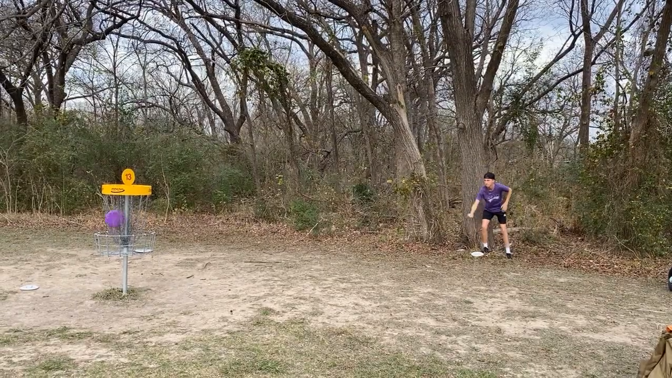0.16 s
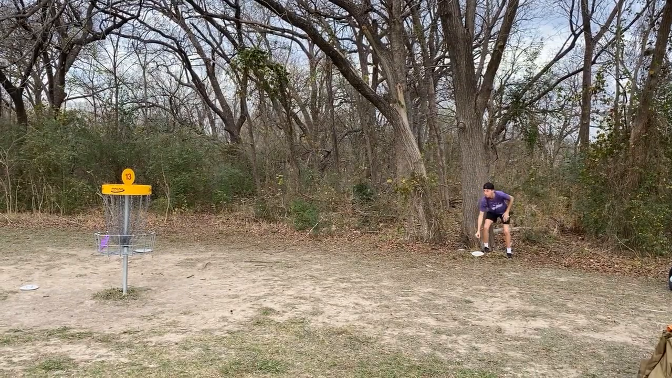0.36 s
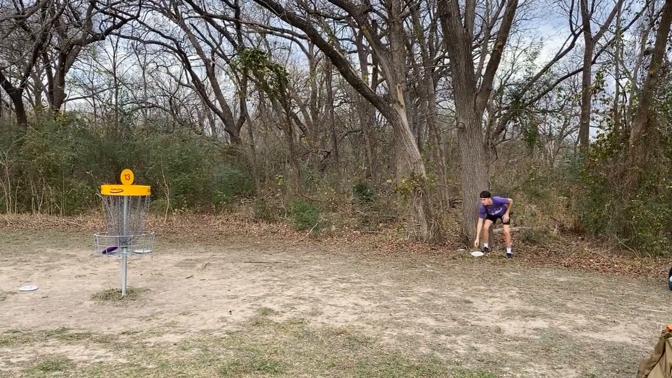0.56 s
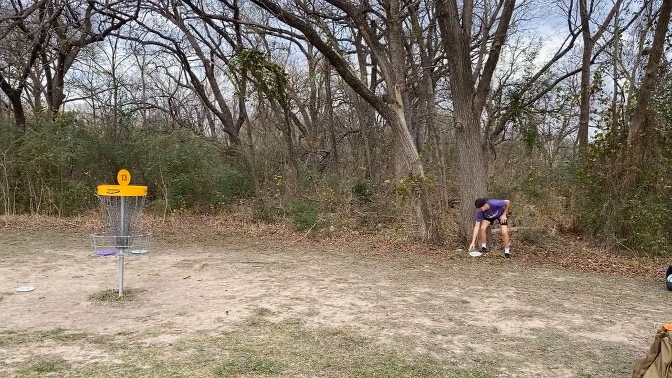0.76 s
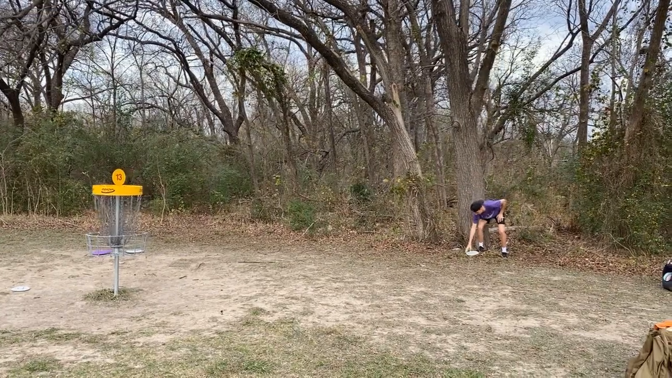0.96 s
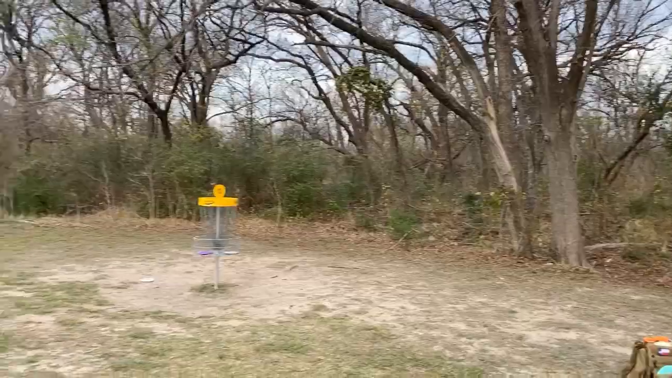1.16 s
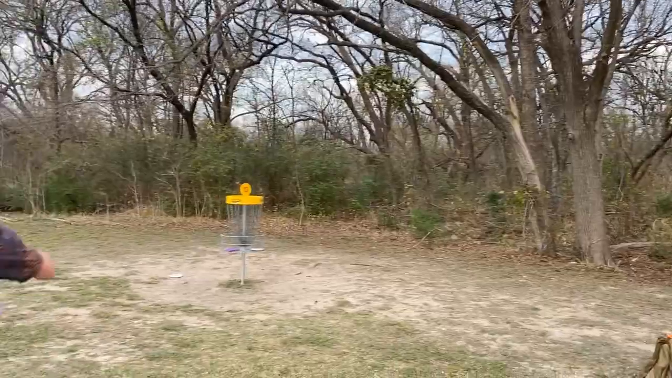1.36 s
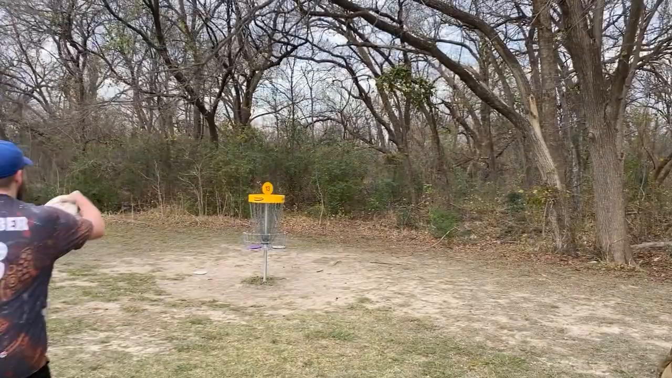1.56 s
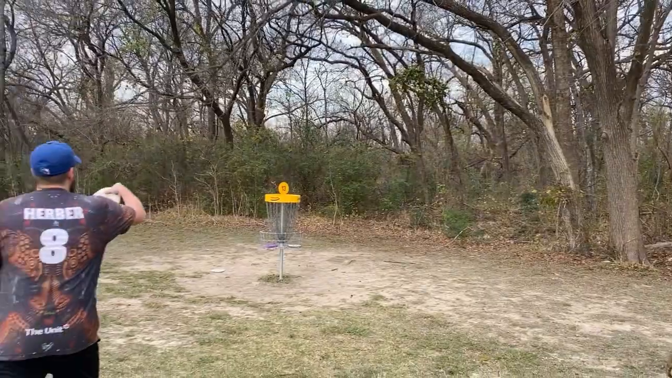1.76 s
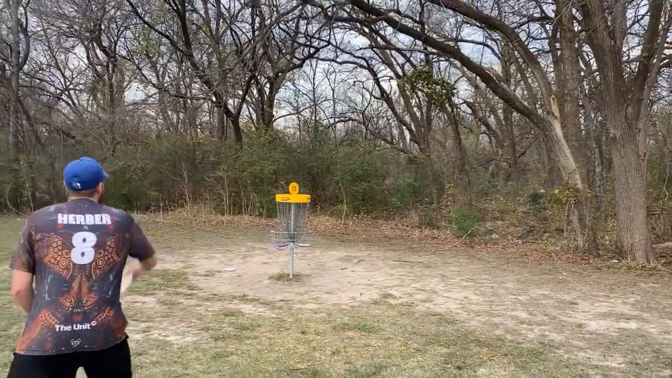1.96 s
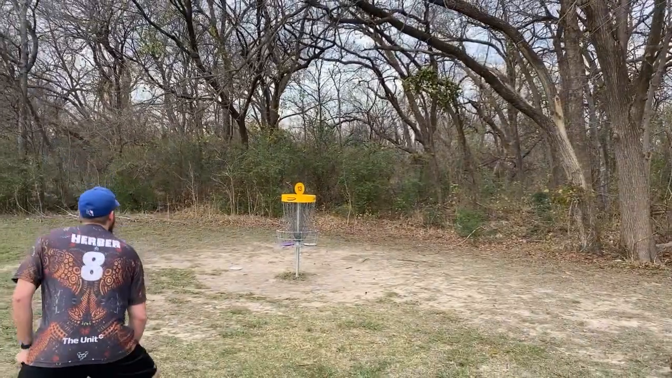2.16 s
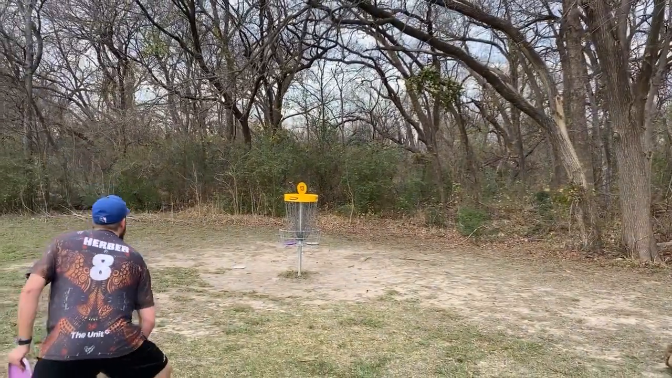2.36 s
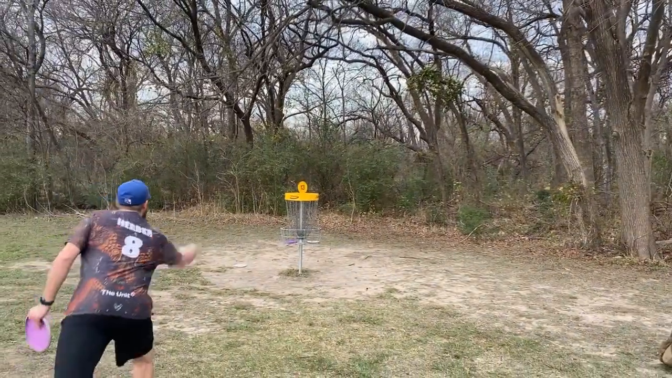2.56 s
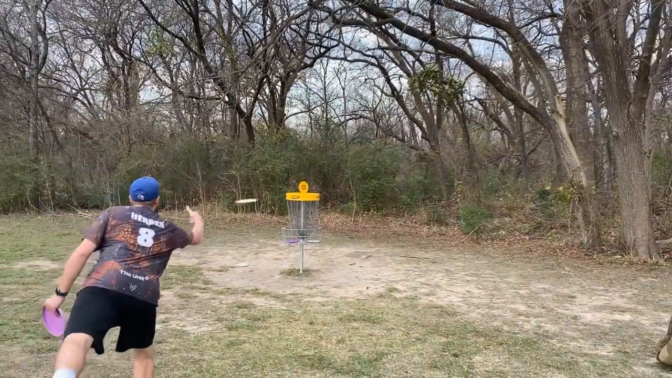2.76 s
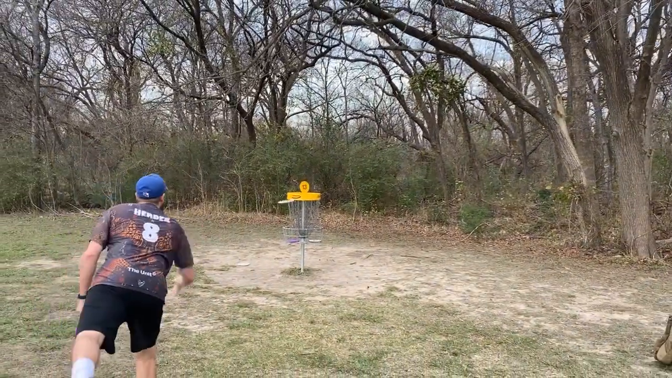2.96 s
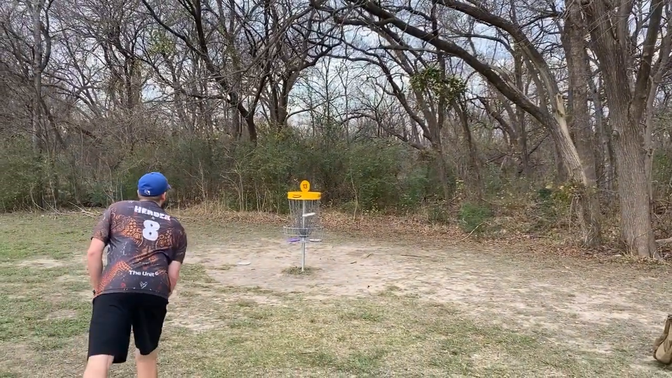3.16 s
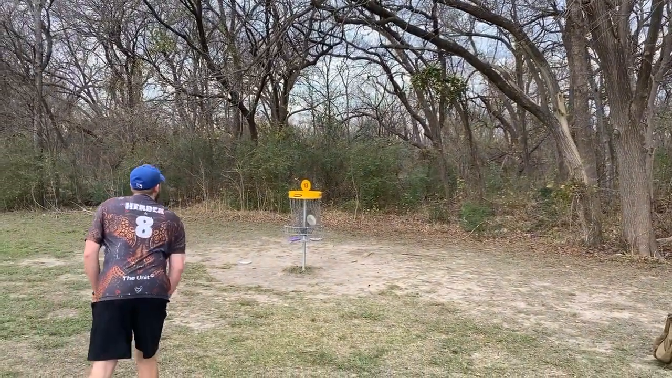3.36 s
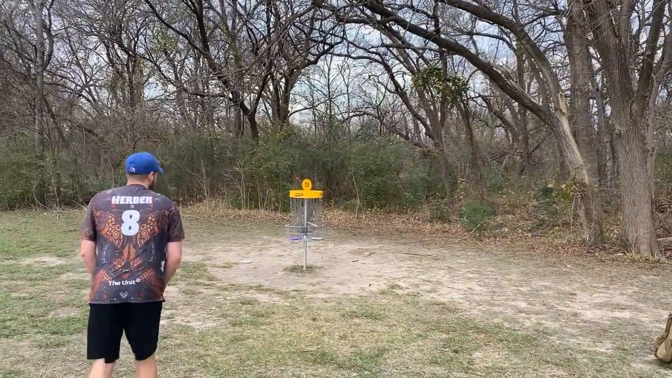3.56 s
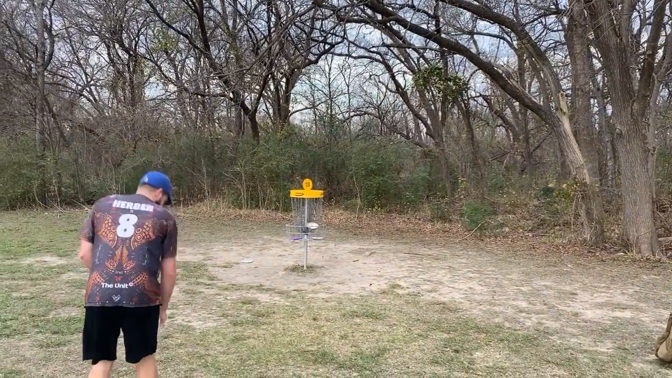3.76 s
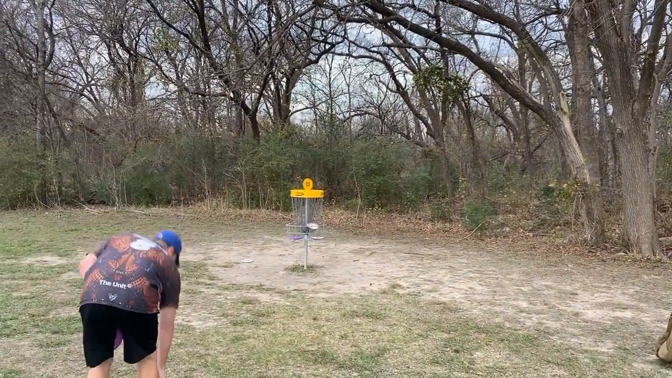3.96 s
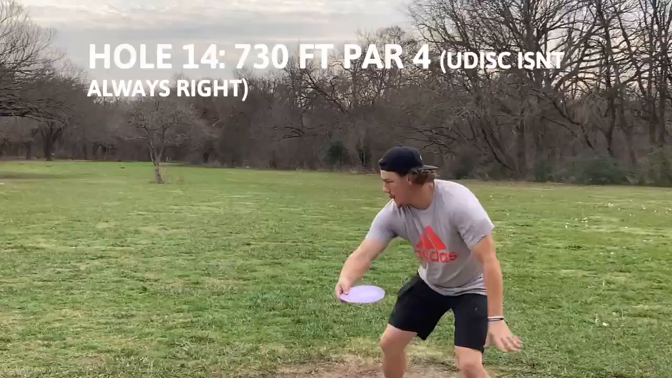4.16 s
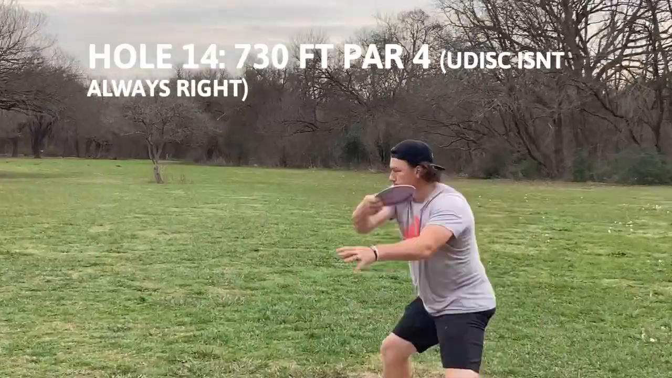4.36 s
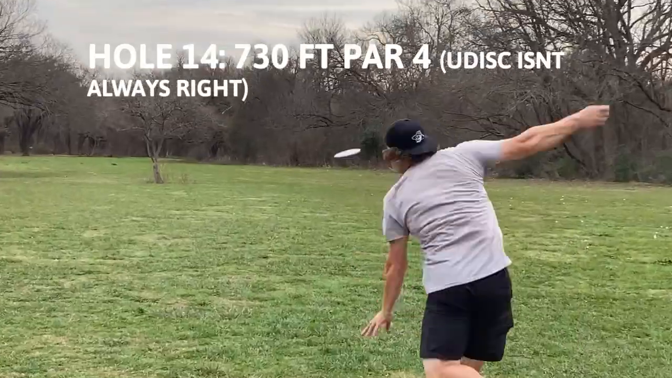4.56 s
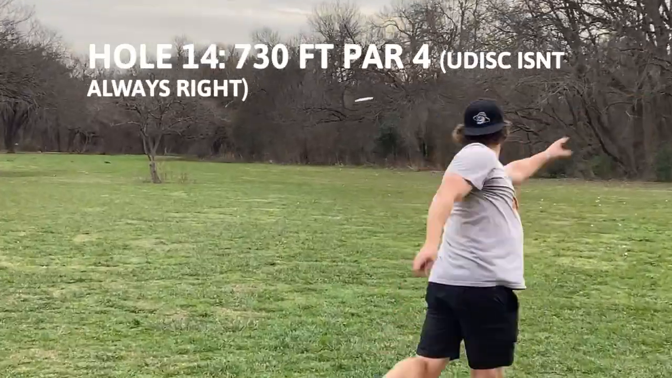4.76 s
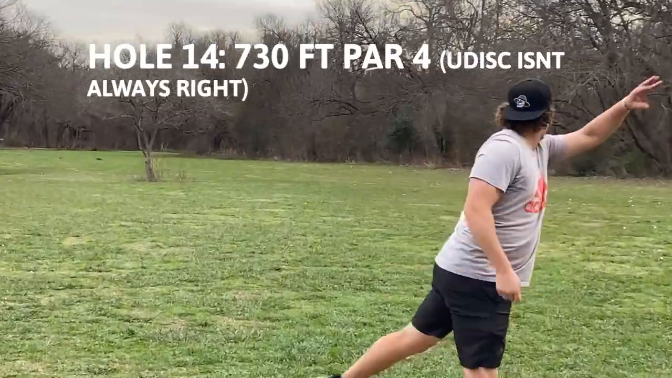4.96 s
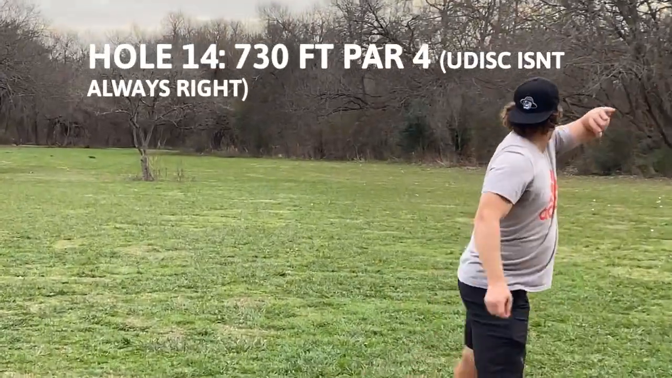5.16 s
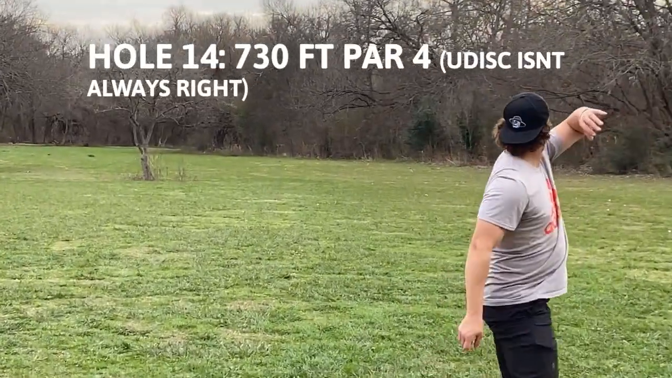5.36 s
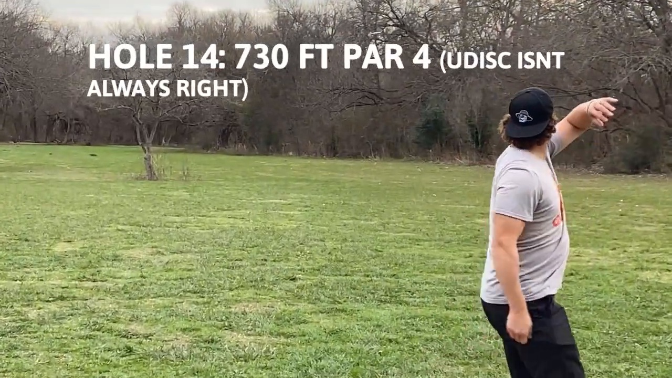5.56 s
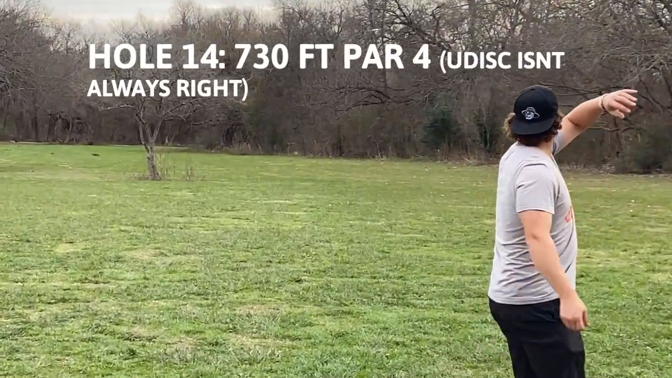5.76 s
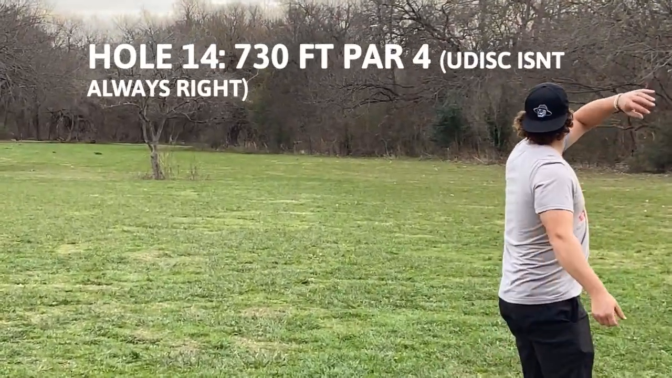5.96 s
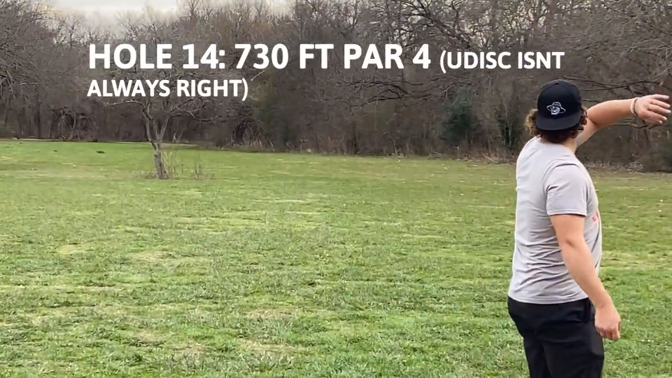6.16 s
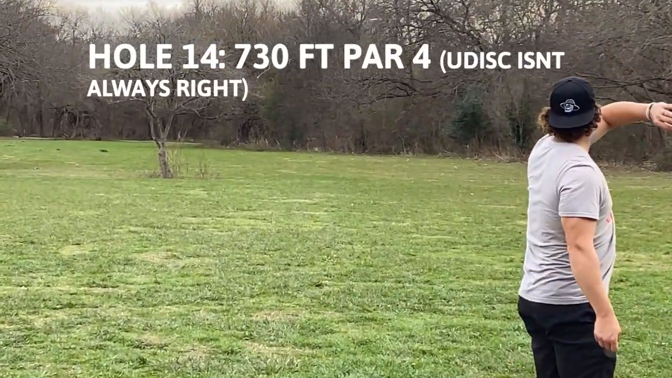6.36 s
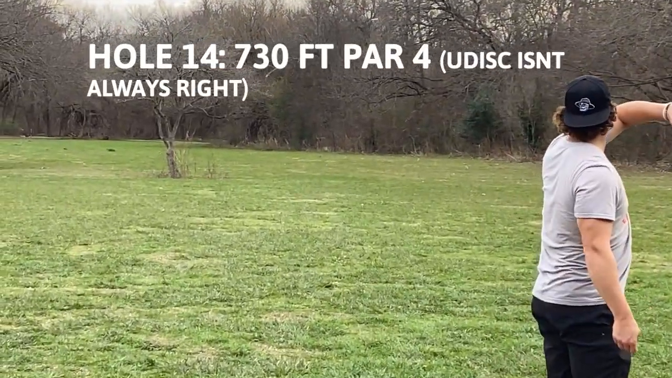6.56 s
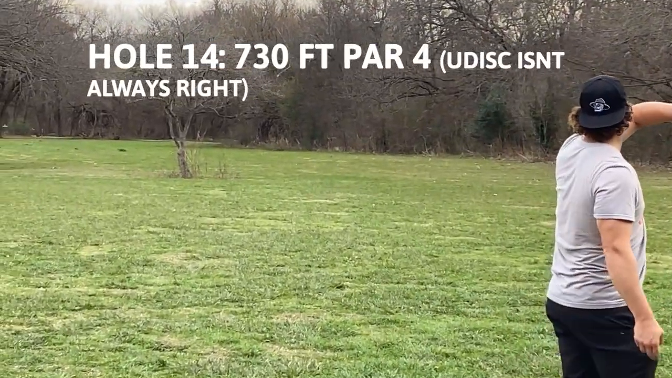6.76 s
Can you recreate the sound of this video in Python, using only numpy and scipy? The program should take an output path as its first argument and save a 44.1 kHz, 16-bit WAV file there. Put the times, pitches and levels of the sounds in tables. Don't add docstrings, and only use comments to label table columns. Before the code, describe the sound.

Two discs clash into a metal chain basket, each ring abruptly cut, with cloth rustles between; then open field, small birds and a distant engine.

```python
import sys
import numpy as np
from scipy import signal
from scipy.fft import rfft, irfft, next_fast_len
from scipy.io import wavfile
from scipy.ndimage import uniform_filter1d, map_coordinates

SR = 44100
rng = np.random.default_rng(int(sys.argv[2]) if len(sys.argv) > 2 else 0)


def ratio_of_db(decibels):
    return 10 ** (np.asarray(decibels, float) / 20)


def materialize(psi):
    bounded = np.clip(np.atleast_2d(psi).T, -1, 1)
    quanta = np.round(bounded * 32767).astype(np.int16)
    wavfile.write(sys.argv[1], SR, quanta)


N = 300762
T = np.arange(N) / SR

# start in seconds, road rumble in dB, tyre roar at first and at last in dB.
SHOTS = [
    (0, -41.5, -51, -51.5),
    (1.108, -41.5, -47.5, -47.5),
    (4.205, -43, -51.5, -52),
]
# frequency in Hz, density in dB per Hz.
RUMBLE = [(12, -59), (20, -21.5), (41, -1.5), (70, 7), (157, -4), (222, -10.5), (272, -18.5), (420, -15.5),
          (550, -49), (920, -120)]
# frequency in Hz, density in dB per Hz.
WOOD_ROAR = [(150, -20.5), (250, -2), (372, -21), (499, -4), (729, -4), (913, -3), (1480, -9),
             (2320, -21.5), (2900, -26.5), (7250, -42), (15500, -47.5)]
# frequency in Hz, density in dB per Hz.
FIELD_ROAR = [(150, -48), (250, -12.5), (525, -6.5), (795, -4), (1120, -10), (2440, -25), (4030, -33),
              (7000, -38), (12500, -46), (15500, -51)]
# start in seconds, hold in seconds, centre in Hz, level in dB,
# swell in dB per second.
PASSING = [
    (.95, .158, 650, -45.5, 190),
    (1.35, .005, 1600, -45.5, 250),
    (3.05, .15, 1010, -47, 38),
    (3.6, .6, 1030, -56, 60),
    (2.74, .28, 4350, -74, 250),
]
# time in seconds, shaft rate in Hz, load in dB.
ENGINE = [
    (4.21, 33.69, -42.5),
    (4.57, 36.39, -37),
    (4.75, 38.41, -37),
    (4.8, 41.4, -45),
    (5.2, 44.15, -44.5),
    (5.6, 46.07, -46),
    (5.8, 48.27, -43.5),
    (6.1, 51.08, -47),
    (6.35, 49.08, -43.5),
    (6.82, 50.1, -43.5),
]
# multiple of the shaft rate, level at idle in dB, gain in dB per shaft Hz.
ORDERS = [(2, 1.5, -0.18), (3, -22, 2.5), (4, -12.5, -0.12), (6, -31.5, 1.05)]

# time in seconds, pitch in Hz, level in dB.
RISE = [(5.234, 2605, -53), (5.245, 3010, -51), (5.257, 3550, -60), (5.27, 3830, -52.5), (5.284, 3900, -58)]
FLAT = [(5.393, 2526, -56.5), (5.405, 2585, -53), (5.432, 2670, -60)]
FALL = [(5.444, 3150, -59), (5.454, 3160, -51), (5.486, 2270, -60)]
# seconds before the last verse for RISE, FLAT and FALL.
VERSES_BACK = [(0, 0, 0), (.352, .352, .355), (.692, .7, .707), (1.038, 1.045, 1.043)]
# time in seconds, pitch in Hz, level in dB.
SWEEP = [(5.765, 1820, -66.5), (5.79, 1960, -61), (5.818, 2470, -56), (5.843, 2755, -53.5),
         (5.875, 2800, -58)]
HOOK = [(5.892, 3335, -60), (5.91, 2950, -49), (5.938, 3680, -46.5)]
SLIDE = [(5.978, 4470, -57), (5.992, 4460, -48), (6.02, 4060, -46.5), (6.055, 3423, -51), (6.08, 3190, -47),
         (6.105, 3250, -70)]
DROP = [(6.144, 6120, -80), (6.147, 4223, -53), (6.156, 3387, -50), (6.166, 2670, -55.5),
        (6.181, 2840, -54.5)]
CLOSE = [(6.188, 2470, -54.5), (6.21, 2405, -54), (6.238, 1710, -66)]
# start in seconds, length in seconds, first and last pitch in Hz, level in dB.
CHIRPS = [(1.663, 0.035, 7600, 7450, -67), (2.867, 0.034, 7360, 7300, -70), (3.678, 0.05, 2950, 3290, -54),
          (3.669, 0.02, 2550, 2550, -52), (3.768, 0.02, 2960, 3180, -60), (3.934, 0.031, 2870, 2900, -62),
          (3.995, 0.028, 2850, 2910, -62), (4.142, 0.037, 2860, 3170, -61), (3.9, 0.05, 5900, 5700, -66),
          (3.987, .04, 5800, 5640, -68), (4.152, .04, 5900, 5830, -70.5), (5.194, 0.02, 4800, 3270, -67)]

# start and hold in seconds, crisp level in dB, dull part relative in dB.
RUSTLE = [(1.111, 0.049, -66, 0), (1.292, 0.31, -66, 20.5), (1.664, 0.2, -72.5, 9), (1.893, 0.21, -60, 9),
          (2.215, 0.07, -55.5, 10), (2.329, 0.21, -69.5, 4), (2.738, 0.33, -74, 18.5),
          (2.958, 0.067, -79, 25), (4.203, 0.14, -67.5, -15), (4.41, .02, -79, -12),
          (4.442, 0.017, -54, 5.5), (4.472, 0.0067, -48, 18.5), (4.5, 0.022, -58.5, -4),
          (4.569, 0.017, -66, 14), (4.693, 0.084, -71.5, 12), (4.829, 0.02, -54, 6.5),
          (4.937, 0.28, -62.5, 11), (5.311, 0.045, -61, 6), (5.423, 0.013, -58, 6),
          (6.168, 0.038, -79, -10), (6.253, 0.21, -66.5, -11)]
# frequency in Hz, density in dB per Hz.
CRISP = [(1470, -55.5), (2500, -3), (3290, 3), (3550, -7.5), (4680, -8), (6060, -5.5), (9730, -8.5),
         (15500, -18.5)]
# frequency in Hz, density in dB per Hz.
DULL = [(530, -3), (900, 1), (1750, 6.5), (3180, -4.5), (4460, -8.5), (5000, -5), (6500, -31),
        (11000, -120)]
# time in seconds, peak in dB, dull part relative in dB.
TICKS = [(1.1024, -40, -19), (1.1776, -47.5, -20), (1.216, -60, 3), (1.264, -50, -11), (1.2825, -46, -2),
         (1.442, -43.5, -12), (1.6529, -48, -14.5), (2.199, -52, -13), (2.5079, -52.5, -10),
         (2.968, -53, 15), (1.9578, -42, -3), (2.7708, -47, -24.5), (4.2801, -41.5, 1), (4.325, -40, 2),
         (4.394, -54, -10.5), (4.487, -40, 0), (4.576, -46, 0), (4.607, -58, 13.5), (4.761, -56, -2),
         (4.843, -41, 2), (5.103, -40.5, -8), (5.13, -41, -3.5), (5.149, -53, -5), (5.16, -56, -20),
         (5.178, -48, -20), (5.1824, -35, -8), (5.19, -49, -12.5), (5.21, -58, -18), (5.2393, -46, 12),
         (5.2769, -48, -8), (5.283, -48, -8), (5.32, -49, -8), (5.436, -31, -7)]
# time in seconds, peak in dB,
# pitch in Hz.
THUDS = [
    (0.876, -36, 340),
    (0.897, -34.5, 340),
    (0.91, -32, 330),
    (1.113, -29, 213),
    (2.967, -30, 460),
    (4.326, -34.5, 200),
    (5.24, -35, 238),
    (5.433, -29.5, 703),
]
# frequency in Hz, 60 dB decay time in seconds.
WOOD_DECAY = [(300, 0.37), (3000, 0.89), (12000, 0.19)]

# time in seconds, peak in dB, pitch in Hz, cage ring relative in dB.
FIRST_KNOCKS = [(0.002, -28.5, 1780, -19.5), (0.012, -32, 1900, -40.5), (0.03, -31.5, 1950, -43),
                (0.047, -26.5, 885, -44), (0.058, -27, 705, -49), (0.067, -26, 860, -38),
                (0.088, -32, 770, -45.5), (0.106, -29, 900, -45), (0.119, -25, 760, -40),
                (0.126, -31, 1500, -46), (0.178, -30, 810, -35), (0.267, -21.5, 838, -31.5),
                (0.272, -21, 2900, -51), (0.279, -30, 780, -46), (0.289, -37.5, 940, -46.5),
                (0.362, -23.5, 2730, -32), (0.348, -33, 810, -27), (0.427, -47, 1310, -15),
                (0.359, -41.5, 1450, -21), (0.457, -42, 2000, -32), (0.475, -37, 1438, -28),
                (0.487, -39, 1890, -10.5), (0.902, -46, 786, -18), (0.915, -51, 1860, -13.5),
                (0.965, -44, 840, -47), (1.076, -40.5, 650, -45)]
# time in seconds, peak in dB, pitch in Hz.
SECOND_KNOCKS = [(3.229, -25, 965), (3.2295, -40, 620), (3.231, -22.5, 2550), (3.234, -23, 3850),
                 (3.247, -28.5, 1510), (3.256, -23.5, 1160), (3.2635, -23.5, 952), (3.295, -27.5, 1700),
                 (3.31, -32.5, 920), (3.274, -22, 1090), (3.286, -22.5, 1470), (3.302, -34.5, 1000),
                 (3.495, -35, 1010)]
# multiple of the pitch, level in dB.
DISC_MODES = [(1, -0.5), (1.75, -9), (2.4, -8.5), (3.5, -11.5)]
# frequency in Hz, density in dB per Hz.
SCRAPE = [(240, -47), (400, -30.5), (584, -9.5), (778, -5.5), (1070, -8), (1610, -7), (1740, -7),
          (4300, -6), (5590, -47.5), (9460, -120)]
# frequency in Hz, level in dB, 60 dB decay time in seconds.
CAGE_MODES = [(1454, -3.5, 0.3), (1854, 1.5, .9), (1888, 0, 1.2), (2080, -9.5, .7), (2403, -2.5, 1),
              (2630, -13.5, .32), (2765, -7, 0.98), (2869, -8, 1.7), (3063, -1.5, 1.1), (3240, 0.5, .4),
              (3340, -7.5, .66), (3490, -1.5, 1.1), (3780, -7, 0.51), (3850, -7.5, .9)]
# time in seconds, peak in dB.
PINGS = [
    (3.23, -28),
    (3.284, -33.5),
    (3.3987, -41.5),
    (3.5, -38.5),
    (3.52, -44),
    (3.617, -47),
    (3.63, -46),
]
# frequency in Hz, level in dB.
LOOSE_MODES = [(3348, -1.5), (3392, -5.5), (2443, -6), (2950, -4.5), (3900, -4), (1726, -4.5), (5640, -11),
               (5000, -15.5)]

# start in seconds, end in seconds.
THROWS = [
    (0.0, 1.1055),
    (3.229, 4.205),
]
# start and hold in seconds, strength in dB, bending and scrape relative in dB.
SURGES = [(0.0, 0.047, -25, 3, -1), (0.093, 0.027, -28.5, 12, 2.5), (0.186, 0.11, -41, -1, -10),
          (0.29, 0.055, -37, 8, -2.5), (0.39, 0.095, -42.5, 1, 7), (0.459, 0.021, -34, 3, -5),
          (0.568, 0.28, -42, -0.5, 3.5), (0.933, 0.02, -43, 12.5, 4), (0.995, 0.046, -50.5, 5, 0),
          (3.228, 0.016, -40, -10.5, -1.5), (3.265, 0.04, -23, -5, -6.5), (3.373, 0.084, -34, -14, -16),
          (3.502, 0.0092, -35.5, 0.5, 0), (3.625, 0.037, -37, -9.5, -6), (3.71, 0.16, -49, -8, -3),
          (3.97, 0.12, -60, -8, 3), (4.104, 0.11, -48.5, -27, -9)]
# time in seconds, peak in dB, bending relative in dB, crack relative in dB.
CLASHES = [(0.0024, -24, 10, -1), (0.058, -22, 5, -4), (0.0666, -19, 7.5, -7), (0.077, -21, -5.5, 0),
           (0.0831, -16.5, 10, -4), (0.103, -13.5, 11, 3), (0.1111, -33, 7, 0), (0.119, -41, 5.5, -9),
           (0.137, -36, 4.5, -11), (0.183, -28, 8, -4), (0.2568, -29.5, 18, 0), (0.266, -34, 15.5, -5),
           (0.2896, -21.5, 4, -8), (0.3113, -24.5, 10.5, -4), (0.318, -30.5, 16, 0),
           (0.331, -31.5, 16, -10), (0.361, -40, 6, 3.5), (0.4257, -42, -4, -1.5), (0.434, -39, 9, -4),
           (0.4527, -38, 6, -4), (0.473, -39, 9, -8), (0.4893, -25.5, 11, -3), (0.589, -45, 4, -9),
           (0.614, -48, 8, -4), (0.6513, -42, 18.5, 1), (0.6992, -43.5, 17.5, 3), (0.732, -54, 17, -9),
           (0.7856, -59, 12, -6), (0.879, -47, 16.5, 3), (0.9147, -36.5, 12, 0), (0.9278, -32, 11.5, 2),
           (0.9874, -42, 5, -7), (1.0158, -42, 14, -3), (1.073, -49.5, 5, 9), (3.2303, -26, -8.5, 1.5),
           (3.2374, -25, -9, 5.5), (3.251, -41, -3.5, 2.5), (3.268, -35, -8, -1), (3.2845, -24, 1, 0),
           (3.395, -36, 6.5, -8), (3.449, -40, -4, 0), (3.4704, -44, -7, -2), (3.494, -27, 3, -4),
           (3.5031, -28, 3, 6.5), (3.6164, -33, -2, 4), (3.861, -47.5, 1, 3), (3.947, -42, -12, -9),
           (3.9581, -56, -8, 10), (4.0265, -40.5, -13, -10), (4.063, -45, -18, -2), (4.084, -57.5, -10, -1),
           (4.1257, -60, -15, -12), (4.1836, -51, -13, -5)]
# frequency in Hz, level in dB.
BEND_MODES = [(4512, 7.5), (4556, 5), (4580, 8.5), (4650, 3.5), (4680, -4), (4860, -8), (4808, -2.5),
              (4780, -4), (4925, -2.5), (5080, -9)]
# frequency in Hz, spread between links in Hz, level in dB.
HIGH_MODES = [(11800, 120, -4), (11680, 110, 5), (11850, 76, 4), (12750, 90, -2), (12850, 81, 1),
              (13100, 120, -9.5), (14120, 160, -10.5), (14600, 240, -17.5), (15050, 180, -17),
              (9100, 110, -10), (6300, 780, -19.5), (8470, 1100, -15), (10400, 500, -20),
              (5460, 300, -19.5), (9680, 87, -20), (12200, 120, -5), (7600, 170, -19), (8300, 120, -20.5)]
# frequency in Hz, density in dB per Hz.
CLATTER = [(3120, -29.5), (5300, -3), (6560, -10.5), (7860, -5), (11000, -13), (15300, -11.5),
           (16500, -120)]

FIELD_S, SECOND_S = ENGINE[0][0], THROWS[0][1]
SURGE_RISE, SURGE_SAG = 370, 46
LOUD_DB = -32.5
KNOCKS = np.vstack([FIRST_KNOCKS, [(*row, -38) for row in SECOND_KNOCKS]])


def unit(x):
    return x / np.sqrt(np.mean(x ** 2) + 1e-20)


def along(points, hz):
    f, v = np.transpose(points)
    return np.interp(np.log(hz + 1), np.log(f + 1), v)


def curves(rows):
    s, *columns = np.transpose(rows)
    return np.array([np.interp(T, s, c, left=-150, right=-150) for c in columns])


def wobble(rate, size=N):
    return map_coordinates(rng.standard_normal(int(N * rate / SR) + 4), [T[:size] * rate])


def filtered(x, response):
    m = next_fast_len(N + SR)
    return irfft(rfft(x, m) * response(np.fft.rfftfreq(m, 1 / SR)), m)[:N]


def ring(hz, db, t60, attack=0.00086):
    t = T[:SR * 3 // 4]
    hz, db, t60 = (np.reshape(v, (-1, 1)) for v in (hz, db, t60))
    return ratio_of_db(db - 60 * t / t60) * np.sin(2 * np.pi * hz * t) * (1 - ratio_of_db(-60 * t / attack))


def contacts(rate, spread_db):
    when, size = rng.random(N), rng.standard_normal(N)
    uneven = ratio_of_db(spread_db * np.minimum(np.abs(size), 2))
    return unit((when < rate / SR) * np.sign(size) * uneven)


def blows(rows, db):
    return np.bincount(np.round(rows[:, 0] * SR).astype(int), ratio_of_db(db), N)


def burst(rows, db, t60):
    return signal.oaconvolve(blows(rows, db), ratio_of_db(-60 * T[:SR // 10] / t60))[:N]


def swell(s, hold, db, rise, sag, fall, hop=32):
    t = T[::hop, None] - s
    level = db + rise * np.minimum(t, 0) - sag * np.clip(t, 0, hold) - fall * np.maximum(t - hold, 0)
    return np.interp(T, T[::hop], ratio_of_db(level).sum(1))


def within(spans):
    return sum((T >= a) & (T <= b) for a, b in spans) > 0


def noise(spectrum, grit=0., rate=1000., patchy_db=1.):
    raw = rng.standard_normal(N) + grit * contacts(rate, spread_db=-0.5)
    coloured = filtered(raw, lambda f: ratio_of_db(along(spectrum, f)))
    return unit(ratio_of_db(patchy_db * (wobble(5.177) + wobble(30))) * coloured)


def snap(rows, db, spectrum):
    shape = filtered(T == T[SR], lambda f: ratio_of_db(along(spectrum, f)))[SR - 200:SR + 201]
    return signal.oaconvolve(blows(rows, db), shape / shape.max(), "same")


def struck(force, modes):
    return np.pad(signal.oaconvolve(force[:round(THROWS[-1][1] * SR)], modes), (0, N))[:N]


def far_road():
    start, rumble_db, first_db, last_db = np.transpose(SHOTS)
    shot = np.maximum(np.searchsorted(start, T, side="right") - 1, 0)
    gone = (T - start[shot]) / np.diff(np.append(start, N / SR))[shot]
    roar_db = first_db[shot] + (last_db - first_db)[shot] * gone
    roar = np.where(T < FIELD_S, noise(WOOD_ROAR, patchy_db=1.5), noise(FIELD_ROAR, patchy_db=1.73))
    in_phase, quadrature, passing = wobble(450), wobble(450), 0
    for s, hold, hz, db, rate in PASSING:
        heard = swell(s, hold, db, rate, 0, rate) * (shot == shot[round(s * SR)])
        carrier = 2 * np.pi * hz * T
        passing = passing + heard * (in_phase * np.sin(carrier) + quadrature * np.cos(carrier))
    return ratio_of_db(rumble_db[shot] - 0.5) * noise(RUMBLE, patchy_db=1.5) + ratio_of_db(roar_db) * roar + passing


def far_motor():
    tone = np.sin(2 * np.pi * 100 * T + 2.0 * wobble(5.5))
    return ratio_of_db(-54.5 + 3.4 * wobble(7.1)) * tone * (T > FIELD_S)


def engine():
    shaft_hz, load_db = curves(ENGINE)
    turn = 2 * np.pi * np.cumsum(np.maximum(shaft_hz, 0) * (1 + 0.0052 * wobble(5.5))) / SR
    idle_hz, open_hz = ENGINE[0][1], 41.4
    gained_hz = np.clip(shaft_hz - idle_hz, 0, open_hz - idle_hz)
    out = 0
    for k, db, gain_db in ORDERS:
        echo_db = -25 * np.exp(-((k * shaft_hz - 170.2) / 19) ** 2)
        order_db = load_db + db + gain_db * gained_hz + echo_db + 3.5 + 3.6 * wobble(6)
        out = out + ratio_of_db(order_db) * np.sin(k * turn)
    return out


def whistle(rows, shift=0., db=0., fade=0.004, uneven_db=3.2):
    s, hz, level = np.transpose(rows)
    start = round((s[0] + shift) * SR)
    t = s[0] + T[:round((s[-1] - s[0]) * SR)]
    edge = np.clip(np.minimum(t - s[0], s[-1] - t) / fade, 0, 1)
    pitch = uniform_filter1d(np.interp(t, s, hz), size=300, mode="nearest")
    note_db = np.interp(t, s, level) + db + 3.5 + uneven_db * wobble(126.4, size=len(t))
    note = edge * ratio_of_db(note_db) * np.sin(2 * np.pi * np.cumsum(pitch) / SR)
    return np.pad(note, (start, N))[:N]


def birds():
    notes = []  # (note, shift in s, level in dB)
    for verse in VERSES_BACK:
        notes += [(note, -back, -4.5) for note, back in zip((RISE, FLAT, FALL), verse)]
    for note in (SWEEP, HOOK, SLIDE, DROP, CLOSE):
        notes += [(note, 0.557 * k, 0) for k in range(2)]
    notes += [(note, -0.547, -5) for note in (DROP[1:], CLOSE)]
    songs = sum(whistle(note, s, db + 1.2 * rng.standard_normal()) for note, s, db in notes)
    stray = sum(whistle([(s, a, db), (s + length, b, db)], fade=0.0059) for s, length, a, b, db in CHIRPS)
    return songs * (T > FIELD_S) + stray


def thrower():
    at, hold, crisp_db, dull_db = np.transpose(RUSTLE)
    ticks = np.array(TICKS)
    tick_db, tick_dull_db = ticks[:, 1], ticks[:, 1] + ticks[:, 2]
    rise, sag, fall = 300, 10, 500
    crisp = swell(at, hold, crisp_db + 1.5, rise, sag, fall) + burst(ticks, tick_db - 9, t60=0.017)
    dull = swell(at, hold, crisp_db + dull_db - 8.0, rise, sag, fall) + burst(ticks, tick_dull_db - 9, t60=0.035)
    thuds = 0
    for s, db, hz in THUDS:
        thuds = thuds + np.pad(ring(hz, db, 7 / hz, attack=0.0024)[0], (round(s * SR), N))[:N]
    grass = crisp * noise(CRISP, grit=1.0, rate=1300, patchy_db=2.16)
    cloth = dull * noise(DULL, grit=0.29, rate=550, patchy_db=1.2)
    return thuds + snap(ticks, tick_db + 3, CRISP) + grass + cloth


def trunks(x):
    hz, t, z = signal.stft(rng.standard_normal(SR * 3 // 4), SR, nperseg=256)
    decay = ratio_of_db(-60 * t / along(WOOD_DECAY, hz)[:, None])
    tail = signal.istft(z * decay, SR, nperseg=256)[1]
    return signal.fftconvolve(np.pad(x, (400, 0)), tail / np.linalg.norm(tail))[:N]


def disc(cycles=24):
    at, hold, surge_db, _, scrape_db = np.transpose(SURGES)
    rubbing = swell(at, hold, surge_db + scrape_db, SURGE_RISE, SURGE_SAG, 710) * within(THROWS)
    scrape = ratio_of_db(-11) * rubbing + burst(KNOCKS, KNOCKS[:, 1] - 13, t60=0.025)
    multiple, mode_db = np.transpose(DISC_MODES)
    knocks = np.zeros(N + SR)
    for s, db, hz, _ in KNOCKS:
        modes = ring(hz * multiple, db + mode_db, cycles / hz / multiple ** 0.67, attack=0.00056)
        scatter = ratio_of_db(rng.normal(0, 2.5, len(DISC_MODES)))
        knocks[round(s * SR):][:modes.shape[1]] += scatter @ modes
    return knocks[:N] + scrape * noise(SCRAPE, grit=1.5, rate=300, patchy_db=3.5)


def cage(count=60):
    strong = ring(*np.transpose(CAGE_MODES))
    strong = strong * ratio_of_db([3 * wobble(22, size=strong.shape[1]) for _ in CAGE_MODES])
    thin = rng.random((count, 2))
    weak = ring(1300 + 2400 * thin[:, 0], -12.5, 0.19 + 1.6 * thin[:, 1])
    rods = np.vstack([strong, weak])
    loose = ring(*np.transpose(LOOSE_MODES), 0.089, attack=0.006)
    out = np.zeros(N + SR)
    for s, db, _, cage_db in KNOCKS:
        out[round(s * SR):][:rods.shape[1]] += ratio_of_db(db + cage_db + rng.normal(0, 2.2, len(rods))) @ rods
    for s, db in PINGS:
        out[round(s * SR):][:loose.shape[1]] += ratio_of_db(db + rng.normal(0, 1.9, len(loose))) @ loose
    return out[:N]


def link_clatter():
    s, hold, surge_db, _, _ = np.transpose(SURGES)
    hits, second = np.array(CLASHES), T > SECOND_S
    clatter_db = LOUD_DB + 1.3 * (surge_db - LOUD_DB) - 5
    clatter = swell(s, hold, clatter_db, SURGE_RISE, SURGE_SAG, 200) * within(THROWS)
    crack_db = hits[:, 1] + hits[:, 3] - 8.5 - 2.5 * (hits[:, 0] > SECOND_S)
    envelope = ratio_of_db(-5.5 - 3.6 * second) * clatter + burst(hits, crack_db, t60=0.046)
    return envelope * noise(CLATTER, grit=0.83, rate=660, patchy_db=1.16)


def chain_links(bend_t60=0.089, high_t60=0.11):
    s, hold, surge_db, bend_db, _ = np.transpose(SURGES)
    sounding, second = within(THROWS), T > SECOND_S
    bending = swell(s, hold, surge_db + bend_db, SURGE_RISE, SURGE_SAG, 227) * sounding
    jingle = swell(s, hold, surge_db, SURGE_RISE, SURGE_SAG, 227) * sounding
    hits, out = np.array(CLASHES), 0
    high_db = LOUD_DB + 0.58 * (hits[:, 1] - LOUD_DB)
    centre, spread, level = np.transpose(HIGH_MODES)
    for hz, db in BEND_MODES:
        pushes, taps = contacts(rate=140, spread_db=1.0), contacts(rate=59, spread_db=2.0)
        luck = rng.standard_normal((len(hits), 3))
        detune, uneven = rng.standard_normal((2, len(HIGH_MODES)))
        bend = ring(hz, db, bend_t60 * ratio_of_db(0.3 * db), attack=0.035)[0, :SR // 3]
        high = ring(centre + 1.05 * spread * detune, level + 3.5 * uneven, high_t60)[:, :SR // 4]
        clash = blows(hits, hits[:, 1] + hits[:, 2] - 17.5 + 2.8 * luck[:, 0])
        push = ratio_of_db(-42.5) * bending * pushes + clash
        out = out + struck(push * ratio_of_db(second * (4.5 - 0.39 * db)), bend)
        for k in range(2):
            clash = blows(hits, high_db - 36.5 + 6.0 * luck[:, k + 1])
            tap = ratio_of_db(-44.5) * jingle * np.roll(taps, k * SR) + clash
            out = out + struck(tap, high[k::2].sum(0))
    return out


def scene():
    plastic, song = disc(), birds()
    steel = chain_links() + link_clatter() + cage()
    ringing = (steel + ratio_of_db(-14.5) * trunks(steel + plastic)) * within(THROWS)
    background = far_road() + far_motor() + engine()
    return (ringing + plastic + song + ratio_of_db(-10.5) * trunks(song) + background + thrower())[None]


def roll_off(x):
    return signal.sosfilt(signal.butter(12, 15680, fs=SR, output="sos"), x)


def record(dry):
    return roll_off(dry)


dry = scene()
out = record(dry)
materialize(out)
```